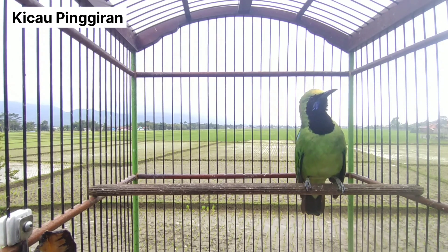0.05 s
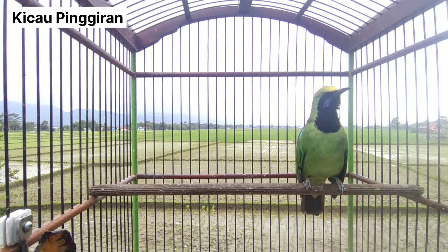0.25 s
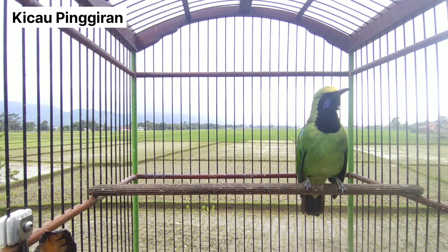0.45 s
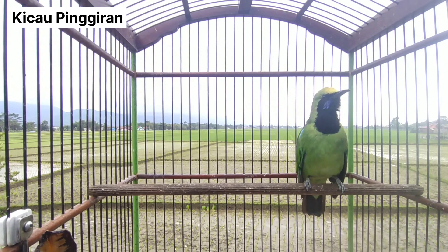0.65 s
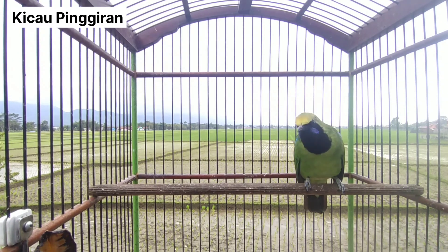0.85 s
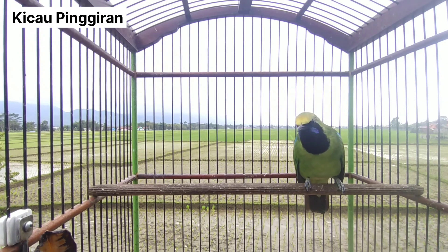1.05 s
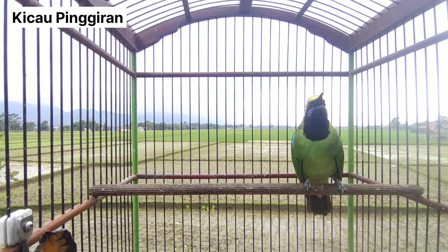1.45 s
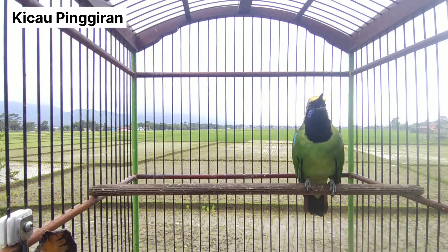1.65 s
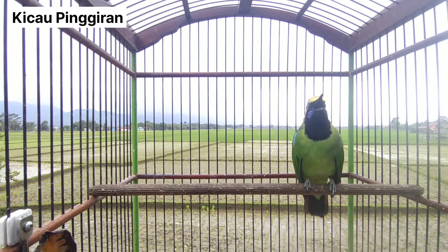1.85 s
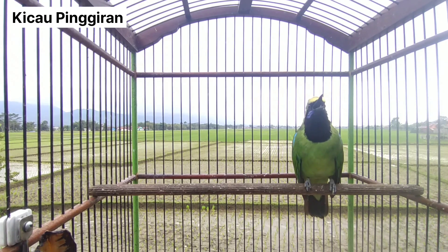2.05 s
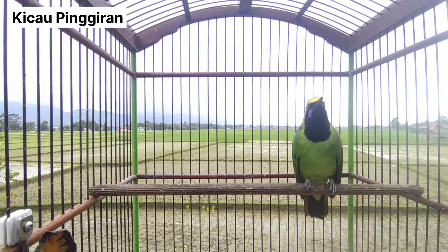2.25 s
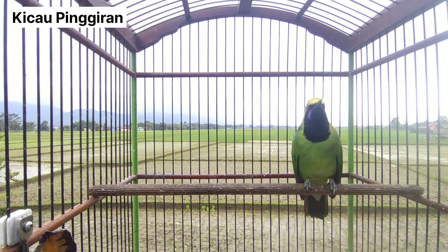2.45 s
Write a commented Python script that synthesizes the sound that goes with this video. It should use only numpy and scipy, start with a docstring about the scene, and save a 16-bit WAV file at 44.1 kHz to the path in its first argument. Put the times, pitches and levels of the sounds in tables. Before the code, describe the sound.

A caged songbird calls close by outdoors. At about 0.2 seconds a harsh, hissing rasp slides up, swells and slowly fades, with a slight puff of wind near 1 second. From 1.2 to 2.2 seconds the bird rattles off seventeen fast, high chirps, ending in a faint falling wheeze by 2.5 seconds. Soft cage taps accompany the rattle and wheeze. A quiet rumble and distant low hum continue underneath.

```python
"""A caged songbird, close by in open country, over outdoor rumble and a far, low hum.
First one long harsh rasp, a chaotic tone with hiss, slides up, swells and fades; wind puffs briefly.
The bird turns its head and rattles off seventeen fast pitch arches, coloured by throat and beak.
A faint falling wheeze ends the song; soft taps in the cage accompany rattle and wheeze.
The cage and its surroundings scatter each note briefly."""
import sys
import numpy as np
from scipy.fft import rfft, irfft
from scipy.io import wavfile
from scipy.ndimage import uniform_filter1d, minimum_filter1d

SR = 44100
rng = np.random.default_rng(int(sys.argv[2]) if len(sys.argv) > 2 else 0)


def wrap_up_sound(samples):
    """Save the sound to the file named by the first command line argument, as 16-bit audio."""
    columns = np.atleast_2d(samples).T
    # keep every value between -1 and 1, then stretch to whole-number steps
    tamed = np.clip(columns, -1, 1)
    steps = np.round(tamed * 32767).astype(np.int16)
    wavfile.write(sys.argv[1], SR, steps)


N = 110250
T = np.arange(N) / SR
HZ = np.maximum(np.fft.rfftfreq(2 * N, 1 / SR), 1)

# noise spectra (frequency [Hz], relative level [dB])
OUTDOOR_SPECTRUM = [(25, 3), (60, 2), (120, 2), (200, 5), (350, -2.5), (600, -8), (1200, -20),
                    (2500, -20.5), (5000, -28.5), (7000, -31.5), (8500, -20.5), (10500, -40.5),
                    (15000, -54)]
WIND_SPECTRUM = [(25, -15), (45, 2), (85, 7), (130, -10), (400, -24), (1000, -60)]
TAP_SPECTRUM = [(100, -8.5), (250, -30), (600, -5), (1200, -7.5), (2500, -9), (8000, -55.5)]
RASP_AIR_SPECTRUM = [(200, -24.5), (600, -20), (1200, -20.5), (1700, -12), (2300, -8), (2700, -7.5),
                     (3600, -10), (4400, -0.5), (5200, -15.5), (6500, -39)]
RASP_HISS_SPECTRUM = [(4000, -27), (5400, -3.5), (6300, 4.5), (7100, 4), (8000, -0.5), (8800, -3),
                      (10000, -8), (11500, -14), (13000, -21.5), (13800, -42), (15000, -36), (16000, -45)]
BEAK_OPENING_SPECTRUM = [(7000, -23), (8500, 7), (9200, 7), (9900, -1.5), (11500, -21)]
CHIRP_AIR_SPECTRUM = [(700, -20), (1400, -22), (2000, -16.5), (2700, 7.5), (4500, -5.5), (6500, 2),
                      (8500, 2.5), (10500, 0.5), (12800, -9.5), (13700, -22), (15500, -17)]
# left-right likeness of the rumble (frequency [Hz], coherence [0..1])
OUTDOOR_COHERENCE = [(30, 0.71), (150, 1), (400, 0.74), (1500, 0.13), (8000, 0.042)]
# tone contours (time [s], pitch [Hz], level [dB])
HUM_CONTOUR = [(0, 164, -46), (.36, 164, -41.5), (.5, 162, -50), (1.1, 160, -67.5), (1.35, 155, -47.5),
               (1.8, 155, -54), (2.15, 160, -52), (2.5, 146, -69)]
WHEEZE_CONTOUR = [(2.25, 3835, -58), (2.29, 3820, -49.5), (2.33, 3300, -42), (2.37, 2735, -44.5),
                  (2.42, 2370, -39), (2.47, 2200, -45.5), (2.5, 2100, -47.5)]
# cage taps (time [s], level [dB])
TAPS = [(1.426, -42), (1.611, -41), (1.939, -45), (2.129, -53), (2.24, -50), (2.473, -46.5)]
# rasp slide (time [s], centre pitch [Hz])
RASP_SLIDE = [(.185, 1250), (.22, 1600), (.25, 2050), (.28, 2800), (.325, 3400), (.40, 3430), (.6, 3330),
              (.85, 3170), (1.17, 3020)]
# rasp envelopes: tone plus air, tone's extra gain, hiss (time [s], relative level [dB])
RASP_BODY_ENVELOPE = [(0.17, -54), (0.208, -28.5), (0.254, -19), (0.314, -18), (0.848, -30), (0.908, -30),
                      (1.158, -36), (1.19, -26.5)]
RASP_TONE_ENVELOPE = [(.19, -8), (.25, -6), (.33, 0.5), (.6, 0), (1.17, -1)]
RASP_HISS_ENVELOPE = [(0.17, -81), (0.186, -68), (0.222, -45), (0.254, -31.5), (0.3, -21.5), (0.408, -21.5),
                      (0.462, -24.5), (0.984, -38), (1.16, -40), (1.19, -23.5)]
# chirps (top time [s], top pitch [Hz], lead-in [s], level [dB], 2nd harmonic gain [dB], breath [dB])
CHIRP_ARCHES = [(1.22, 2200, 0.027, -11, 7.5, -23.5), (1.266, 5030, 0.032, -14.5, -7, -12.5),
                (1.319, 5480, 0.048, -16, -4, -9.5), (1.376, 5260, 0.041, -16, -4, -10.5),
                (1.434, 5980, 0.026, -14.5, 0.5, -8.5), (1.496, 5990, 0.026, -15.5, 1.5, -10),
                (1.557, 6530, .024, -15.5, 2, -11.5), (1.616, 6120, 0.021, -14, -1.5, -11),
                (1.676, 6360, 0.026, -17, 0, -11), (1.739, 5825, 0.021, -14.5, -2, -13.5),
                (1.801, 5886, 0.024, -14.5, -3.5, -10), (1.866, 5790, 0.026, -16.5, 2.5, -7.5),
                (1.934, 4860, 0.027, -19.5, 8, -7), (1.999, 5680, .024, -16.5, 0.5, -20.5),
                (2.074, 5700, 0.025, -15, -3.5, -12.5), (2.141, 6570, 0.03, -16.5, -2, -15),
                (2.209, 6010, 0.032, -17, -0.5, -13.5)]
# chirp source (multiple [-], level [dB])
CHIRP_HARMONICS = [(1, 0), (2, -7), (3, -18), (4, -27.5)]
# throat and beak resonances (frequency [Hz], gain [dB])
THROAT_RESPONSE = [(1500, -27), (2000, -22), (2600, -3.5), (3400, -4.5), (4000, -3), (4700, 4),
                   (5400, -12.5), (6000, -0.5), (6800, -7), (8500, 3.5), (10000, -4), (12500, -7.5),
                   (14000, -11.5), (16000, -26)]
# left against right microphone (frequency [Hz], level difference [dB], phase lead [rad])
RASP_STEREO = [(1000, -2, -0.36), (2200, -1, -0.3), (2700, -3, -2.4), (3300, 0.5, -0.6), (4750, -1.5, -2.1),
               (4720, -4.5, -2.5), (6900, -2.5, -3), (8640, 8, -1.5), (9550, 28, -8.5), (10000, 49, -13),
               (12000, 14, -3), (15600, 16, -7)]
RATTLE_STEREO = [(300, -5, 3), (2200, 1.5, 1.5), (3130, 4, 2.45), (3670, -2, 2), (4210, 6.5, 2.4),
                 (4760, -7.5, 4.5), (6000, -0.5, 4), (7330, -5.5, 4.5), (7900, 14.5, 8), (9700, 12, 5.5),
                 (10200, 32, 11), (12500, 2.5, -1), (15000, 6.5, 7.5)]


def from_db(db):
    """Decibels to gain."""
    return 10 ** (np.asarray(db) / 20)


def unit_rms(x):
    """Scale to unit power."""
    return x / np.sqrt(np.mean(x ** 2) + 1e-20)


def in_time(rows):
    """Columns of a curve at every sample."""
    times_s, *columns = np.transpose(rows)
    return [np.interp(T, times_s, column) for column in columns]


def at_hz(rows, hz, column=1):
    """Read a spectrum on a log axis."""
    columns = np.transpose(rows)
    return np.interp(np.log(hz), np.log(columns[0]), columns[column])


def filtered(x, response):
    """Apply a frequency response."""
    return irfft(rfft(x, 2 * N) * response)[..., :N]


def noise(spectrum, channels=1):
    """Coloured noise of unit power."""
    return unit_rms(filtered(rng.standard_normal((channels, N)), from_db(at_hz(spectrum, HZ))))


def drift(rate_hz):
    """Random wander of spread 1."""
    return unit_rms(filtered(rng.standard_normal(N), 1 / (1 + (HZ / rate_hz) ** 2)))


def gate(start_s, end_s, attack_s, release_s, t=T):
    """Smooth attack, hold, release."""
    ramp = np.clip((t - start_s) / attack_s, 0, 1) * np.clip((end_s - t) / release_s, 0, 1)
    return np.sin(np.pi / 2 * ramp) ** 2


def phase_of(hz):
    """Running phase of a pitch curve."""
    return 2 * np.pi * np.cumsum(hz) / SR


def outdoor_rumble():
    """Steady noise, alike on both sides in the bass."""
    mid, side = noise(OUTDOOR_SPECTRUM, channels=2)
    coherence = at_hz(OUTDOOR_COHERENCE, HZ)
    mid = filtered(mid, np.sqrt((1 + coherence) / 2))
    side = filtered(side, np.sqrt((1 - coherence) / 2))
    return from_db(-47) * np.array([mid + side, mid - side])


def far_hum():
    """A distant low tone wavers in pitch and level."""
    pitch_hz, level_db = in_time(HUM_CONTOUR)
    phase = phase_of(pitch_hz * (1 + .0144 * drift(7.6)))
    return from_db(level_db + 2 * drift(4)) * np.sqrt(2) * np.sin(phase)


def wind_puff():
    """A brief puff on the microphones."""
    return from_db(-50) * noise(WIND_SPECTRUM, channels=2) * gate(.89, 1.12, .038, .07)


def cage_taps(decay_s=.016):
    """Soft dull taps: decaying noise bursts."""
    envelope = sum(from_db(level_db) * (T > start_s) * np.exp(-np.abs(T - start_s) / decay_s)
                   for start_s, level_db in TAPS)
    return envelope * noise(TAP_SPECTRUM)


def echoes(t60_s):
    """Frequency response of dense dying reflections, unrelated per side, evened in colour."""
    decay = from_db(-60 * T / t60_s) * np.clip(T / .00067, 0, 1)
    spectrum = rfft(rng.standard_normal((2, N)) * decay, 2 * N)
    power = uniform_filter1d(np.abs(spectrum) ** 2, size=2000, axis=-1)
    return spectrum / np.sqrt(power + 1e-12)


def in_cage(x, stereo, scatter_db, reflection_s=.0019, scatter_sidedness=.43):
    """Direct sound, one cage reflection and scatter at two closely spaced microphones."""
    side = np.array([[.5], [-.5]])
    side_db = side * at_hz(stereo, HZ)
    lead_rad = side * at_hz(stereo, HZ, column=2)
    direct_pan, scatter_pan = from_db(side_db), from_db(scatter_sidedness * side_db)
    comb = 1 + from_db(-15.5) * np.exp(-2j * np.pi * HZ * reflection_s)
    early = comb * np.exp(1j * lead_rad) * direct_pan / np.hypot(*direct_pan)
    scatter = from_db(scatter_db) * echoes(t60_s=.074) + from_db(-28.5) * echoes(t60_s=.61)
    late = scatter * scatter_pan / np.hypot(*scatter_pan)
    return filtered(x, np.sqrt(2) * (early + late))


def wheeze(jitter=.06, shimmer_db=4.2):
    """A thin, rough note falls away."""
    pitch_hz, level_db = in_time(WHEEZE_CONTOUR)
    phase = phase_of(pitch_hz * (1 + jitter * drift(448)))
    return from_db(level_db + shimmer_db * drift(150)) * np.sin(phase) * gate(2.24, 2.6, .036, .02)


def rasp(throb_hz=83.8, throb_db=1.1, flutter_db=1.5, wobble=.028):
    """A chaotic tone, shaken in pitch and strength, slides up and sags; air hisses through the beak."""
    pitch_hz, = in_time(RASP_SLIDE)
    body_db, = in_time(RASP_BODY_ENVELOPE)
    tone_db, = in_time(RASP_TONE_ENVELOPE)
    hiss_db, = in_time(RASP_HISS_ENVELOPE)
    jitter = .08 * (1 + .99 * gate(.2002, .32, .03, .0503))  # rougher on the way up
    throb = np.sin(phase_of(throb_hz * (1 + .17 * drift(32))))
    flutter = unit_rms(from_db(flutter_db * drift(200) + throb_db * throb))
    phase = phase_of(pitch_hz * (1 + jitter * drift(650) + wobble * drift(150)))
    tone = np.sqrt(2) * from_db(tone_db) * (np.sin(phase) + from_db(-24.5) * np.sin(2 * phase))
    air = from_db(-6) * noise(RASP_AIR_SPECTRUM) * gate(.19, 1.6, .11, .05)
    hiss = from_db(hiss_db + 1) * noise(RASP_HISS_SPECTRUM)
    beak_opening = from_db(-28) * noise(BEAK_OPENING_SPECTRUM) * gate(.198, .45, .079, .13)
    return (from_db(body_db) * (tone + air) + hiss + beak_opening) * flutter * gate(.172, 1.2, .028, .01)


def rattle(rise_s=.0138, fall_s=.0102, attack_s=.011, release_s=.0015):
    """Pitch arches, pushed hardest on the way up; harmonics sweep through the throat resonances."""
    voice, breath_envelope = np.zeros(N), np.zeros(N)
    wander, shimmer = drift(780), from_db(2 * drift(310))
    for top_s, top_hz, lead_s, level_db, second_db, breath_db in CHIRP_ARCHES:
        span = np.abs(T - top_s) < .06
        t = T[span] - top_s
        arch = np.exp(-(t / np.where(t < 0, rise_s, fall_s)) ** 2)
        foot = np.clip(1 - arch / .4, 0, 1)  # softer, rougher below 40 % of the arch
        accent_db = 6 * np.exp(-((t + .0105) / .0055) ** 2)
        rest_hz = min(2100, .75 * top_hz)
        jitter = .011 + .06 * foot
        pitch_hz = (rest_hz + (top_hz - rest_hz) * arch) * (1 + jitter * wander[span])
        envelope = gate(-lead_s - attack_s / 2, fall_s + .003, attack_s, release_s, t)
        envelope *= from_db(level_db - 2.5 * foot)
        breath_envelope[span] += envelope * from_db(breath_db)
        for k, source_db in CHIRP_HARMONICS:
            partial_hz = k * pitch_hz
            drive_db = source_db + accent_db + second_db * (k == 2) * (1 - foot)
            gain = from_db(drive_db + at_hz(THROAT_RESPONSE, partial_hz)) * (partial_hz < SR / 2)
            voice[span] += np.sqrt(2) * envelope * gain * np.sin(phase_of(partial_hz))
    breath = breath_envelope * noise(CHIRP_AIR_SPECTRUM)[0]
    return (voice + breath) * shimmer


def scene():
    """The bird turns its head between rasp and rattle: two stereo images."""
    bird = in_cage(rasp(), RASP_STEREO, scatter_db=-3.5)
    bird += in_cage(rattle() + wheeze(), RATTLE_STEREO, scatter_db=-7.5)
    return bird + cage_taps() + wind_puff() + outdoor_rumble() + far_hum()


def record(dry, limiter_s=.002, cutoff_hz=15700):
    """Fast peak limiter, then a steep low-pass."""
    size = int(limiter_s * SR)
    needed_gain = 1 / np.maximum(np.abs(dry).max(axis=0), 1)
    gain = uniform_filter1d(minimum_filter1d(needed_gain, size=size), size=size)
    return filtered(dry * gain, .98 / np.sqrt(1 + (HZ / cutoff_hz) ** 160))


dry = scene()
out = record(dry)
wrap_up_sound(out)
```